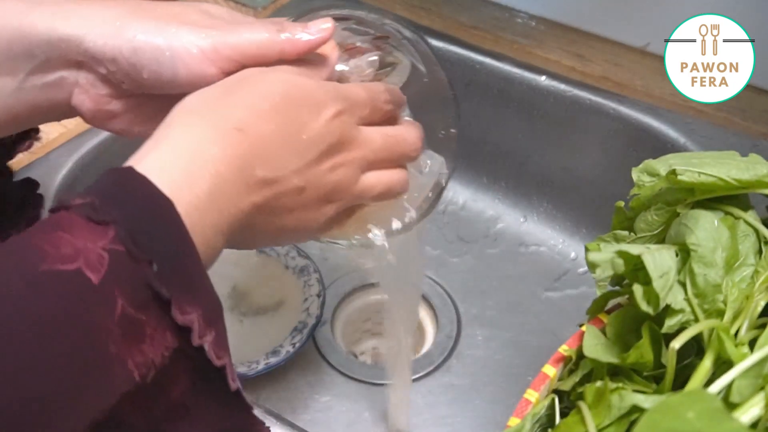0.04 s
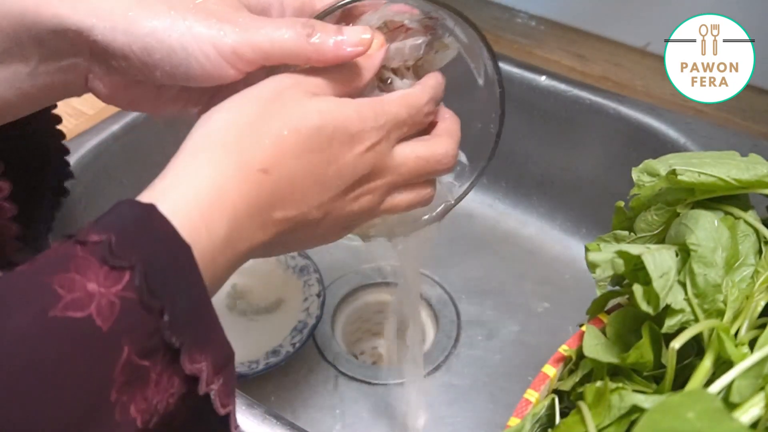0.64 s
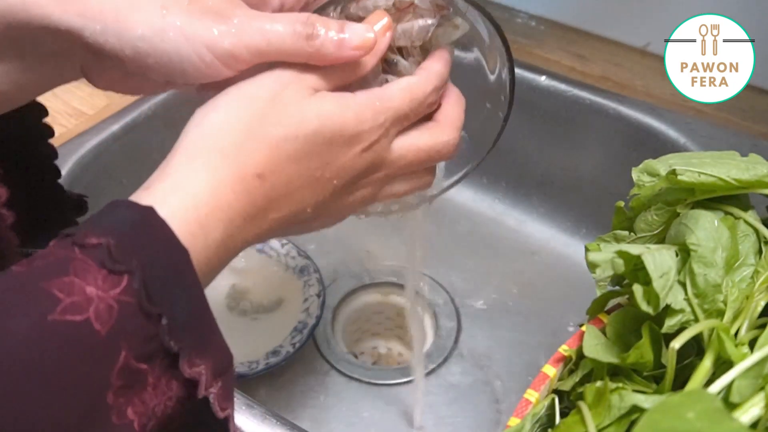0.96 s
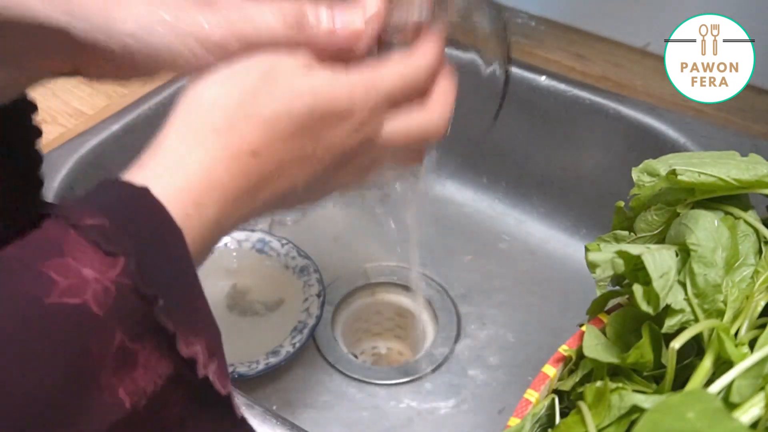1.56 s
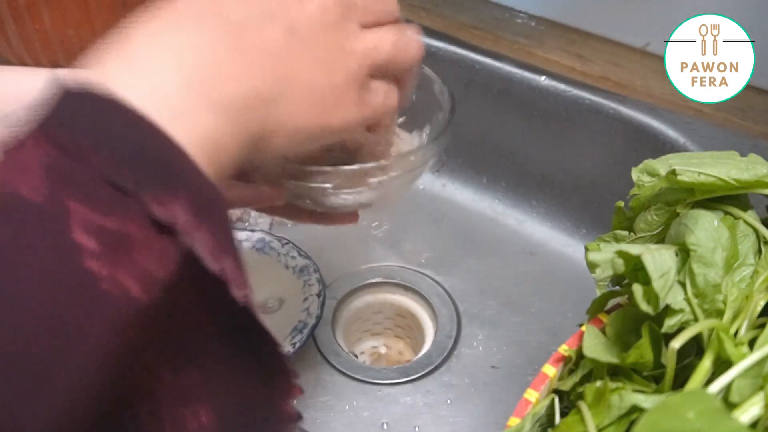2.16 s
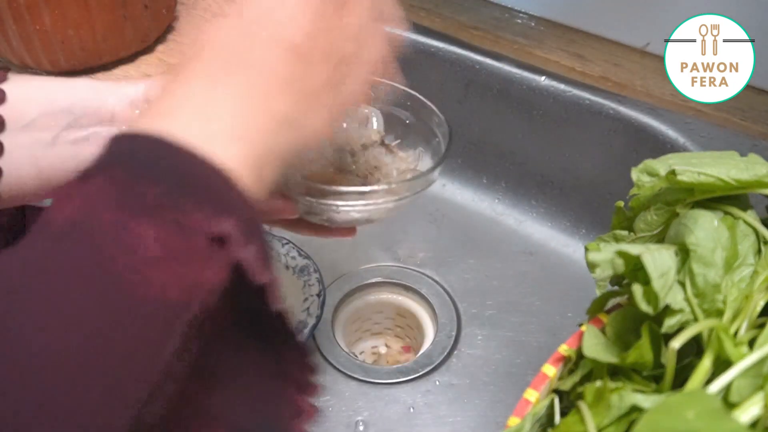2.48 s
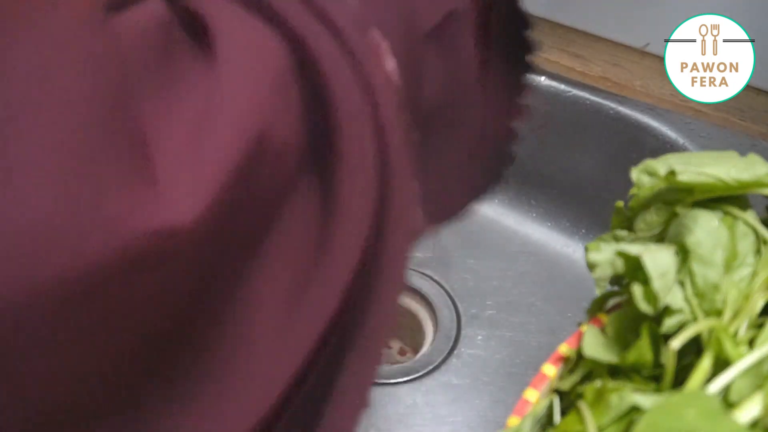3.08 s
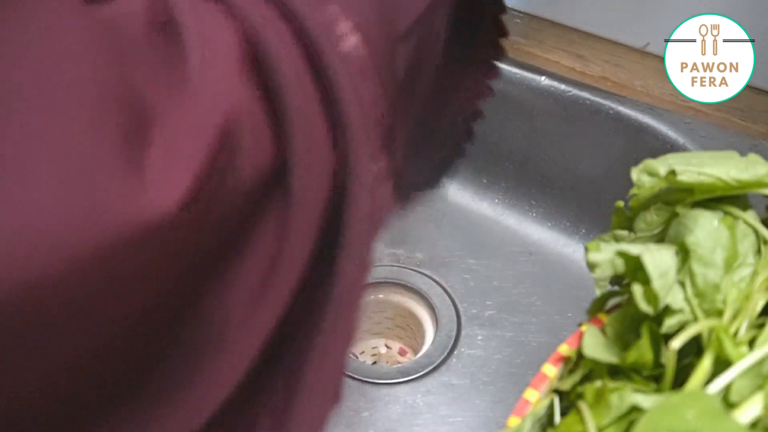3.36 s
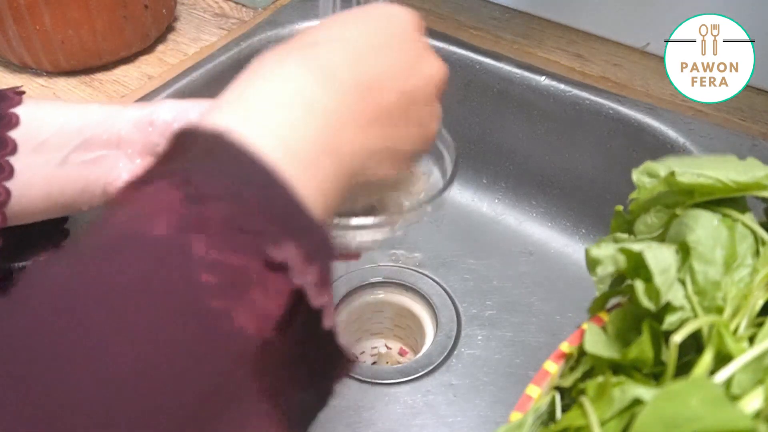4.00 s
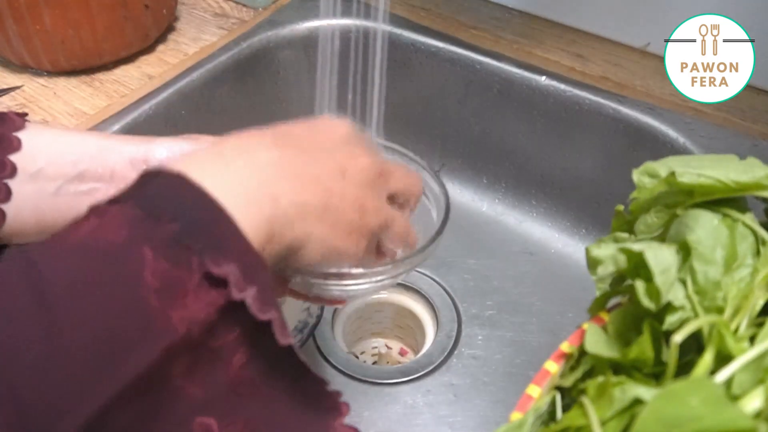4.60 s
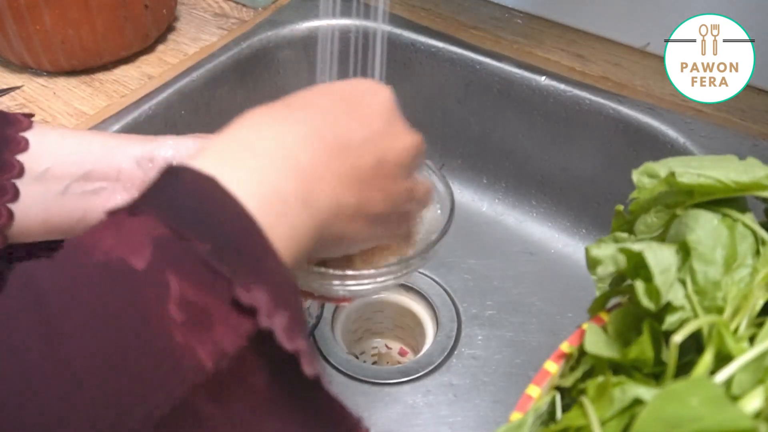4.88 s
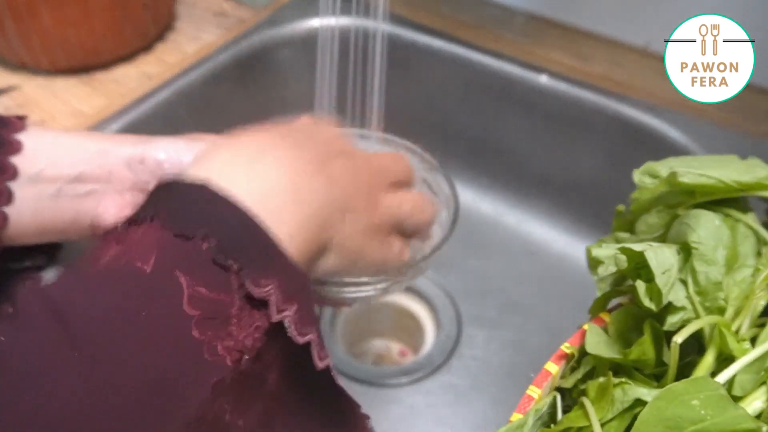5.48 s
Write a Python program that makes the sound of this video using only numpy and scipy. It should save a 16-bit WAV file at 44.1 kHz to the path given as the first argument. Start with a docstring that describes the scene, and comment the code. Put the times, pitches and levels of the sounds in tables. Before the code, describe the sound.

Water strained from a glass bowl patters into a steel sink, then thins to drips that ring the metal while the drain gurgles softly. A sleeve rubs past. The tap spits and opens, and its spray fizzes on the steel and into the bowl, where a hand stirs the water with bubbly sloshes. It is all heard from close by in a small kitchen.

```python
"""First you hear water pattering into a steel sink as it is strained from a glass bowl. It thins to drips
that ring the steel, and gurgles down the drain, where the air in the pipe rings. A sleeve rubs past,
then the tap whistles, spits and opens. Its spray fizzes on the steel and then into the bowl, which slowly
fills while a hand stirs in it; each trapped bubble rings a tiny note. A small kitchen, from close by."""
import sys
import numpy as np
from scipy import signal
from scipy.fft import rfft, irfft, next_fast_len
from scipy.io import wavfile

SR = 44100
rng = np.random.default_rng(int(sys.argv[2]) if len(sys.argv) > 2 else 0)


def bounce(signal):
    """Save signal as a 16-bit WAV file at the path given by the first command-line argument."""
    frames = np.transpose(np.atleast_2d(signal))
    limited = np.clip(frames, -1, 1)
    pcm = np.round(limited * 32767).astype(np.int16)
    wavfile.write(sys.argv[1], SR, pcm)


N = 249165
TIME = np.arange(N) / SR


def gain_of(db):
    """Turns decibels into a multiplier. Table levels are relative: each sound adds its own gain."""
    return 10 ** (np.asarray(db) / 20)


def evened(x):
    """Scales a sound to an average strength (rms) of one."""
    return x / np.sqrt(np.mean(x ** 2) + 1e-20)


def value_at(points, hz):
    """Reads between the rows of a (frequency, value) table, on a log-frequency axis."""
    known_hz, value = np.transpose(points)
    return np.interp(np.log(hz + 1), np.log(known_hz + 1), value)


def loudness(rows):
    """Joins (time, level) rows into a gain curve that fades quickly outside them."""
    times, db = np.transpose(rows)
    outside = np.maximum(times[0] - TIME, 0) + np.maximum(TIME - times[-1], 0)
    return gain_of(np.interp(TIME, times, db)) * np.exp(-(outside / 0.098) ** 2)


def held(start_s, end_s, attack_s, release_s):
    """A gain that rises, holds and dies away."""
    rise = 1 - np.exp(-np.maximum(TIME - start_s, 0) / attack_s)
    return rise * np.exp(-np.maximum(TIME - end_s, 0) / release_s)


def drift(rate_hz):
    """A slow random wobble of strength one."""
    return evened(signal.sosfilt(signal.butter(2, rate_hz, fs=SR, output="sos"), rng.standard_normal(N)))


def waver(depth_db, rate_hz):
    """A gain that wanders at random."""
    return gain_of(depth_db * drift(rate_hz))


def add(mix, start_s, sound):
    """Mixes a sound in at the given time."""
    part = mix[max(round(start_s * SR), 0):][:len(sound)]
    part += sound[:len(part)]


def colour(x, points):
    """Shapes the tone: turns each frequency up or down by a (frequency, level) table."""
    size = next_fast_len(len(x) + SR // 10)
    gains = gain_of(value_at(points, np.fft.rfftfreq(size, 1 / SR)))
    return irfft(rfft(x, size) * gains, size)[:len(x)]


def cut_lows(x, hz, order):
    """Removes sound below hz; a higher order cuts more steeply."""
    return signal.sosfilt(signal.butter(order, hz, "highpass", fs=SR, output="sos"), x)


def resonate(x, hz, width):
    """Lets through one band around hz; the narrower it is, the longer it rings."""
    return signal.lfilter(*signal.iirpeak(hz, hz / min(width, SR / 4), SR), x)


def sliding_resonance(x, hz, width):
    """A ringing band whose pitch follows the curve hz."""
    turn = np.exp(2j * np.pi * np.cumsum(hz) / SR)
    decay = np.exp(-np.pi * width / SR)
    return 2 * (turn * signal.lfilter([1 - decay], [1, -decay], x / turn)).real


def ring(x, notes):
    """Makes an object ring at several notes at once."""
    return sum(gain_of(db) * resonate(x, hz, width) for hz, width, db in notes)


def noisy_note(hz, width, samples=N):
    """Noise narrowed down to a fluttering note."""
    return evened(resonate(resonate(rng.standard_normal(samples), hz, width), hz, width))


def impacts(per_s, spread_db):
    """Random clicks of uneven size."""
    size = gain_of(spread_db * np.minimum(rng.exponential(1, N), 4))
    return size * rng.choice([-1, 1], N) * (rng.random(N) < per_s / SR)


def bubbles(per_s, spread_db, cycles, top_hz):
    """A cloud of bubbles of all sizes; each rings for a few cycles, its pitch creeping up."""
    births = impacts(per_s, spread_db)
    pitches = np.geomspace(top_hz / 16, top_hz, 40)
    pitch_index = np.searchsorted(pitches, rng.uniform(0, top_hz, N))
    out, t = np.zeros(N), np.arange(SR // 25) / SR
    for k, hz in enumerate(pitches):
        age = hz * t / cycles
        ping = np.sin(2 * np.pi * hz * t * (1 + .005 * np.minimum(age, 5))) * np.exp(-age)
        out += signal.oaconvolve(births * (pitch_index == k), evened(ping))[:N]
    return evened(out)


def wall_echoes(x, t60_s, count):
    """Quick echoes between the sink's walls; t60_s is the time they take to fade by 60 dB."""
    when, sign = rng.random((count, 2)).T
    echoes = np.zeros(SR // 40)
    delay = (when * (len(echoes) - 20)).astype(int) + 20
    echoes[delay] = np.sign(sign - .5) * gain_of(-60 * delay / SR / t60_s)
    return signal.oaconvolve(x, echoes / np.linalg.norm(echoes))[:len(x)]


# The notes of the steel where water lands: (pitch [Hz], width [Hz], level [dB])
STEEL_NOTES = [(700, 140, -3.5), (1750, 68, -5), (2030, 31, 0), (3140, 120, 3.5), (3630, 250, -0.5),
               (3980, 140, -5), (4650, 130, 1.5), (5470, 190, -1), (5900, 140, -7.5), (6450, 130, -8),
               (7100, 140, -3.5), (8120, 130, -10), (12400, 440, -13)]
def steel(x):
    """The sheet steel rings with whatever lands on it; part of the plain slap is heard too."""
    return 0.55 * x + ring(x, STEEL_NOTES)


def rattle(per_s, spots):
    """Water ticks on several spots of the steel, each with its own echoes."""
    out = np.zeros(N)
    for _ in range(spots):
        ticks = impacts(per_s / spots, spread_db=2.6)
        out += ticks + 1.3 * wall_echoes(ticks, t60_s=0.03, count=40)
    return steel(evened(out))


# How loudly the stream from the bowl patters: (time [s], level [dB])
POUR_LEVELS = [(0.0, -28), (0.17, -39.5), (0.5, -39), (0.7, -38.5), (0.79, -45.5), (0.88, -45), (1.03, -43),
               (1.12, -40), (1.26, -39.5), (1.42, -40.5), (1.56, -42.5), (1.87, -47), (2.14, -52.5),
               (2.4, -73)]
# The tone of that patter: (frequency [Hz], level [dB])
POUR_TONE = [(100, -56), (400, -21), (700, -21.5), (1300, -9.5), (2000, 0.5), (2700, 1), (3200, -4),
             (5000, -1), (7500, -2), (11000, -4), (15500, -9)]
def pour():
    """The falling stream breaks into ticks on the steel, bubbles and a sparkle of fine droplets."""
    ticks = rattle(per_s=260, spots=6)
    foam = bubbles(per_s=700, spread_db=3, cycles=6, top_hz=15000)
    sparkle = bubbles(per_s=260, spread_db=3.5, cycles=13, top_hz=13000)
    sparkle = evened(colour(sparkle, [(2500, -39), (4500, 11), (6500, 12), (14000, -1)]))
    stream = evened(colour(0.24 * foam + ticks, POUR_TONE)) + 0.54 * sparkle
    return gain_of(-5) * loudness(POUR_LEVELS) * waver(depth_db=2, rate_hz=18) * stream


# The low notes of the sink's floor: (pitch [Hz], width [Hz], level [dB])
FLOOR_NOTES = [(153, 17, 5), (233, 17, 5.5), (261, 54, 1.5), (620, 280, 1)]
def sink_floor():
    """The stream drums softly on the sheet steel; stray water keeps it drumming afterwards."""
    stream = gain_of(-47) * loudness(POUR_LEVELS) ** 0.39
    stray_water = gain_of(-72.5)
    return np.hypot(stream, stray_water) * evened(ring(impacts(per_s=510, spread_db=5.5), FLOOR_NOTES))


# The tone of the room's air: (frequency [Hz], level [dB])
AIR_TONE = [(15, -75), (25, -43), (90, -15), (142, -14), (383, -2), (462, -0.5), (856, -6.5), (1120, 2.5),
            (1280, 4.5), (1860, -18), (2070, -4), (2850, -17), (3540, -8.5), (5570, -4), (15000, -68)]
def room_tone():
    """Faint steady air noise with a low wavering hum."""
    air = evened(colour(rng.standard_normal(N), AIR_TONE))
    hum = noisy_note(hz=144.7, width=14)
    return gain_of(-60.5) * air + gain_of(-78) * hum


# The tone of a drop's splat: (frequency [Hz], level [dB])
SPLAT_TONE = [(100, -39), (400, -5.5), (1000, -2.5), (3000, 5.5), (6000, 7), (10000, 11.5), (13000, 7),
              (15500, 0)]
# The largest drops: (time [s], level [dB], pitch [Hz], splat level [dB], ring time [s])
BIG_DROPS = [(0.0121, -5.5, 5900, -35, 0.002), (0.031, -27, 5500, -53, .0026),
             (0.0602, -22, 2700, -51, .003), (0.1022, -18.5, 4760, -44, 0.0027),
             (0.168, -24, 4770, -37, 0.0028), (0.2243, -20, 6430, -33, .0026),
             (0.261, -17.5, 4370, -30.5, 0.0053), (0.283, -15, 3930, -46, 0.0023),
             (0.295, -16, 5280, -50, 0.0035), (0.3344, -22, 3580, -34, 0.0032),
             (0.357, -20.5, 4130, -35, .003), (0.433, -13.5, 6070, -47, .003),
             (0.5015, -19, 4350, -43, 0.0027), (0.613, -27, 6280, -43, .0026),
             (0.622, -24.5, 4900, -43, .0026), (0.662, -24.5, 8440, -40, .0024),
             (0.6832, -24.5, 4830, -40, .0026), (0.722, -22, 6340, -37, 0.0023),
             (0.7517, -25.5, 5470, -44, .003), (0.8293, -25, 6330, -40.5, 0.0023),
             (1.001, -28, 8980, -50, 0.0029), (1.065, -20.5, 4200, -42, 0.0019),
             (1.0893, -25, 5870, -48, 0.002), (1.1295, -21, 12300, -35.5, .0024),
             (1.1682, -26, 7100, -37, 0.0024), (1.206, -27.5, 3630, -43, .003),
             (1.2303, -19, 4850, -39, .0026), (1.2637, -15.5, 5030, -50, 0.0017),
             (1.272, -23, 5600, -54, .0026), (1.283, -28, 8150, -31.5, .0026),
             (1.304, -23.5, 5260, -46, 0.0023), (1.346, -30.5, 3560, -31.5, .0026),
             (1.3724, -21.5, 7980, -32, 0.0029), (1.427, -19.5, 9370, -40, 0.0041),
             (1.474, -19, 5330, -27, 0.0025), (1.499, -26, 7500, -33, .0026),
             (1.519, -11.5, 5450, -41, 0.0018), (1.544, -12.5, 5450, -30, 0.0022),
             (1.592, -5.5, 4300, -32, .0022), (1.614, -23, 4000, -31, .0026),
             (1.645, -25, 4560, -35, 0.0024), (1.6567, -10.5, 4340, -25.5, 0.0022),
             (1.662, -15, 6200, -49, 0.0023), (1.7243, -20, 7360, -36, 0.0027),
             (1.7298, -24.5, 4200, -35, 0.0021), (1.768, -21, 7380, -55, 0.002),
             (1.7978, -36, 3500, -52, .0026), (1.8148, -32, 4640, -59, 0.0028),
             (1.8457, -29.5, 6600, -38, .003), (1.872, -33, 4400, -43, .003),
             (1.8992, -31, 4900, -49, .003), (1.926, -26, 4620, -39.5, .003),
             (1.9554, -28.5, 6070, -33.5, .0026), (2.0934, -32, 7270, -41, 0.0026),
             (2.64, -46, 5900, -57, .0026), (3.132, -37, 4700, -58, .0015), (3.2, -39, 5340, -53, .001),
             (3.695, -11, 2800, -41, 0.0015), (3.7098, -5, 5030, -27, 0.0015),
             (3.7733, -4.5, 4000, -33, 0.0014), (3.8535, -12, 8260, -28, 0.0023),
             (4.4891, -3.5, 3380, -49, 0.0013), (5.64, -9.5, 7970, -31, 0.0022)]
def drops():
    """Each drop splats, rings the steel for an instant, and echoes between the sink's walls."""
    out, t = np.zeros(N), np.arange(SR // 12) / SR
    for start_s, db, hz, splat_db, ring_s in BIG_DROPS:
        slap_noise, splat_noise = rng.standard_normal((2, len(t)))
        fade = np.exp(-t / ring_s) * (1 - np.exp(-t * hz / 6))
        bubble = np.sin(2 * np.pi * hz * t * (1 + 2 * t)) * fade
        slap = evened(resonate(resonate(slap_noise, hz, .5 * hz), hz, 0.71 * hz)) * fade
        hit = steel(cut_lows(1.6 * bubble + slap, hz=2800, order=4))
        hit += 0.53 * wall_echoes(hit, t60_s=0.018, count=24)
        splat_fade = (np.exp(-t / 0.003) + 0.047 * np.exp(-t / 0.026)) * (1 - np.exp(-t / 0.001))
        splat = evened(colour(splat_noise, SPLAT_TONE)) * splat_fade
        add(out, start_s, gain_of(db - 4) * hit / abs(hit).max())
        add(out, start_s, gain_of(splat_db + 7.5) * (0.25 * splat + steel(splat)))
    return out


def splatter(peak_after_s=0.019):
    """Fine droplets thrown up by each big drop fall back around it."""
    power = np.zeros(N)
    age = np.arange(SR // 4) / SR / peak_after_s
    for start_s, db, *_ in BIG_DROPS:
        add(power, start_s, gain_of(db - 32.5) ** 2 * age * np.exp(1 - age))
    droplets = steel(bubbles(per_s=900, spread_db=3, cycles=9, top_hz=13000))
    return np.sqrt(power) * evened(colour(droplets, [(1500, -15), (3500, 1), (7000, 0), (13000, -8)]))


# Bubbles that plink in the shallow water: (time [s], level [dB], pitch [Hz])
PLINK_BUBBLES = [(0.064, -36, 6600), (0.082, -36, 3040), (0.126, -22.5, 4230), (0.184, -35, 10900),
                 (0.21, -35, 6350), (0.288, -23.5, 3460), (0.319, -25, 3900), (0.422, -36.5, 2450),
                 (0.4347, -32, 6930), (0.4605, -21, 2710), (0.514, -47, 9700), (0.529, -38, 9300),
                 (0.5556, -38, 2730), (0.7218, -35, 6450), (0.7936, -40, 8240), (0.825, -35, 6970),
                 (0.843, -33, 4850), (0.852, -35, 3400), (0.879, -34.5, 3150), (0.9373, -41.5, 8650),
                 (1.053, -39, 9750), (1.139, -36, 10700), (1.19, -41, 9400), (1.224, -39, 7900),
                 (1.253, -37, 5700), (1.3915, -33.5, 3590), (1.407, -53, 7800), (1.429, -37, 10900),
                 (1.4486, -38, 6000), (1.457, -37, 7540), (1.577, -49, 2350), (1.714, -35, 5380),
                 (1.9776, -35, 3460), (2.033, -46, 9450), (2.1026, -39, 4040), (2.1505, -40, 3700),
                 (2.174, -45, 4130), (2.3313, -41, 4200), (3.935, -22.5, 5440), (4.662, -20.5, 5230),
                 (4.825, -24, 7120), (4.83, -26, 6400), (5.152, -19, 3510), (5.225, -21, 6560),
                 (5.533, -21.5, 3130)]
def plinks():
    """A droplet ticks on the steel and traps a bubble, whose note rises; small ones die sooner."""
    out, t = np.zeros(N), np.arange(SR // 12) / SR
    for start_s, db, hz in PLINK_BUBBLES:
        ring_s = 0.0023 * np.sqrt(3000 / hz)
        swell = (t / ring_s) * np.exp(-(t / ring_s) ** 2)
        note = np.sin(2 * np.pi * hz * t * (1 + 11 * t)) * swell
        hiss = cut_lows(rng.standard_normal(len(t)), .7 * hz, order=4)
        tick = steel(evened(resonate(hiss, hz, .5 * hz))) * (swell + 0.069 * np.exp(-t / 0.0067))
        plink = note + 0.3 * tick
        plink += 0.96 * wall_echoes(plink, t60_s=0.053, count=24)
        add(out, start_s, gain_of(db + 5) * plink / abs(plink).max())
    return out


# Spurts and splashes: (time [s], level [dB], length [s], strongest frequency [Hz], low cut [Hz])
SPURTS = [(0.27, -33.5, 0.045, 4200, 1810), (0.493, -38, 0.012, 4800, 1200),
          (0.844, -40, 0.016, 4970, 1500), (0.878, -39, 0.022, 4330, 1500),
          (3.354, -19.5, 0.0055, 4300, 1280), (3.3673, -20, 0.0045, 5340, 1400),
          (3.482, -22, 0.0055, 9500, 3000), (3.641, -19.5, 0.0037, 11400, 7000),
          (3.646, -27.5, 0.029, 2800, 398), (3.796, -25, 0.012, 3040, 1100),
          (3.886, -27.5, 0.056, 8050, 1500), (4.381, -9.5, 0.035, 2753, 260),
          (4.641, -22, 0.0027, 8670, 4000), (4.655, -20, 0.004, 8500, 3000),
          (5.149, -18.5, 0.003, 8000, 4000), (5.184, -23, 0.0026, 7800, 4000),
          (5.197, -20, 0.012, 5500, 3000), (5.211, -17, 0.0032, 7300, 3500),
          (5.225, -22.5, 0.007, 7500, 4000), (5.335, -16, 0.003, 6600, 3500),
          (5.584, -22, 0.0034, 9000, 4000), (5.598, -21, 0.017, 4500, 2500)]
def splashes():
    """Slugs of water burst into a short, dense shower of droplets; small ones are thin and bright."""
    out = np.zeros(N)
    tone = [(100, -15), (400, 2.5), (1200, 7.5), (7000, 7.5), (15000, 1)]
    for start_s, db, length_s, hz, low_cut_hz in SPURTS:
        age = np.maximum(TIME - start_s, 0) / length_s
        droplets = cut_lows(impacts(per_s=9000, spread_db=2.8), low_cut_hz, order=2)
        shower = evened(colour(resonate(droplets, hz, width=hz), tone))
        out += gain_of(db) * shower * (1 - np.exp(-age / 0.12)) * np.exp(-age ** 2 / 2)
    return out


# The steady notes of the drain's throat: (pitch [Hz], width [Hz], level [dB])
THROAT_NOTES = [(238, 27, -39), (440, 34, -33), (1500, 53, -7), (2130, 93, -5), (3680, 59, -11)]
def burble():
    """Small bubbles keep the drain's throat ringing; its main note wanders as water narrows the gap."""
    pops = impacts(per_s=420, spread_db=2.6)
    main_hz = 1120 * (1 + 0.027 * drift(rate_hz=13))
    return evened(ring(pops, THROAT_NOTES) + gain_of(7) * sliding_resonance(pops, main_hz, width=50))


PIPE_HZ = 477
def trickle(start_s=0.72, end_s=3.4):
    """Water runs unevenly down the drain; as it empties, the burble fades and the pipe's note grows."""
    age = np.maximum(TIME - start_s, 0)
    flow = held(start_s, end_s, attack_s=0.15, release_s=0.35) * waver(depth_db=2.1, rate_hz=11)
    throat = gain_of(-50.5 - 3 * age) * burble()
    pipe = evened(resonate(impacts(per_s=55, spread_db=-6), PIPE_HZ, width=38))
    return flow * (throat + gain_of(-84 + 5.5 * age) * pipe)


# Gulps of air in the drain: (time [s], level [dB], pitch [Hz], pipe level [dB])
AIR_GULPS = [(0.9322, -38.5, 1112, -69), (0.937, -44, 2030, -64), (0.9856, -37, 1110, -62),
             (1.1424, -38.5, 1107, -55), (1.2054, -36.5, 1116, -49), (1.605, -40, 1100, -55),
             (1.686, -44, 1150, -55), (1.753, -40, 1093, -67), (1.8816, -44, 2130, -76),
             (1.9794, -47, 2220, -60), (2.0253, -44.5, 2100, -54), (2.0702, -43, 2070, -60),
             (2.166, -40, 1105, -54), (2.2406, -52, 2160, -47), (2.464, -39.5, 1094, -45.5),
             (2.866, -37, 1130, -49), (2.9218, -45, 1010, -46.5), (3.1801, -30, 1157, -50),
             (3.241, -45, 1125, -54), (3.261, -42.5, 1140, -69), (3.2803, -44, 1130, -71)]
def gulps():
    """The drain swallows air: a slightly rising note, a ragged tail of froth and the pipe's low ring."""
    out, t = np.zeros(N), np.arange(SR // 8) / SR
    for start_s, db, hz, pipe_db in AIR_GULPS:
        note = np.sin(2 * np.pi * hz * t * (1 + 0.92 * t)) * np.exp(-t / 0.0078)
        froth = noisy_note(hz, width=200, samples=len(t)) * np.exp(-t / 0.029)
        pipe = (np.sin(2 * np.pi * PIPE_HZ * t) + 0.38 * np.sin(2 * np.pi * 222 * t)) * np.exp(-t / 0.011)
        gulp = gain_of(db + 5.5) * (note + 0.074 * froth) + gain_of(pipe_db) * pipe
        add(out, start_s - .002, gulp * (1 - np.exp(-t / 0.002)))
    return out


# How loudly the sleeve rubs: (time [s], level [dB])
SLEEVE_LEVELS = [(2.2, -50), (2.372, -51.5), (2.596, -51), (2.74, -45.5), (2.9, -40), (3.032, -44.5),
                 (3.234, -44), (3.35, -51)]
# The tone of the cloth: (frequency [Hz], level [dB])
CLOTH_TONE = [(120, -42), (400, -1.5), (750, -6), (1400, 5), (2500, 1), (3800, 3.5), (6000, -4),
              (9000, -12), (15500, -25)]
def sleeve():
    """Cloth slides by: a dense, soft rub of fibres."""
    fibres = impacts(per_s=11000, spread_db=4)
    return gain_of(-9) * loudness(SLEEVE_LEVELS) * evened(colour(fibres, CLOTH_TONE))


TAP_OPEN_S = 3.365
def whistle():
    """A thin, fluttering tone just before the water comes."""
    swell = held(start_s=3.15, end_s=TAP_OPEN_S, attack_s=0.0068, release_s=.015)
    return gain_of(-61.5) * swell * noisy_note(hz=3810, width=110)


# The notes that the spray rings in the filling bowl: (pitch [Hz], width [Hz], level [dB])
BOWL_NOTES = [(1480, 104, 13.5), (2640, 70, -10), (4200, 56, -13), (4500, 70, -16), (7500, 250, -2)]
# The tone of the fizzing spray: (frequency [Hz], level [dB])
FIZZ_TONE = [(200, -46), (800, -17.5), (2000, 1.5), (3300, 2.5), (4300, 5.5), (5000, 2.5), (7300, 0),
             (8200, -2), (11400, -5), (15500, -14)]
def fizz(flow, open_for_s):
    """Fine jets fizz where they land, louder as the bowl fills."""
    spray = evened(impacts(per_s=20000, spread_db=2.6))
    spray += bubbles(per_s=6000, spread_db=3.2, cycles=10, top_hz=15500)
    uncovered = held(start_s=4.68, end_s=N / SR, attack_s=0.08, release_s=0.1)
    spray += 0.49 * uncovered * ring(spray, BOWL_NOTES)  # the bowl rings once the hand is out of the way
    filling_db = -27.5 + open_for_s  # grows 1 dB each second
    hand_db = -3 * np.exp(-((TIME - 4.75) / 0.08) ** 2)  # the lifted hand briefly softens the spray
    level = flow * gain_of(filling_db + hand_db) * waver(depth_db=1, rate_hz=25)
    return level * evened(colour(spray, FIZZ_TONE))


# Strokes of the hand: (time [s], length [s], small bubble level [dB], medium bubble level [dB])
HAND_STIRS = [(3.576, 0.078, -26.5, -41), (3.793, 0.013, -36, -47), (3.899, 0.014, -28, -35.5),
              (3.979, 0.048, -28, -32), (4.003, 0.086, -16, -25.5), (4.078, 0.096, -18, -35.5),
              (4.177, 0.069, -18, -30), (4.26, 0.24, -21.5, -32), (4.354, 0.13, -20, -27),
              (4.487, 0.12, -15, -28.5), (4.626, 0.055, -39, -34.5), (4.837, 0.071, -25.5, -41),
              (4.911, 0.078, -24, -26.5), (4.998, 0.14, -26, -24.5), (5.16, 0.14, -32, -31.5),
              (5.313, 0.22, -32, -29), (5.49, 0.16, -28, -39)]
def stirring(flow):
    """Gains for small and medium bubbles: they follow the flow, and each stir lets more air in."""
    small, medium = flow * gain_of(-46), flow * gain_of(-45)
    for start_s, length_s, small_db, medium_db in HAND_STIRS:
        stir = held(start_s, start_s + length_s, attack_s=0.005, release_s=0.021)
        small = np.hypot(small, gain_of(small_db) * stir)
        medium = np.hypot(medium, gain_of(medium_db) * stir)
    return small, medium


# The notes of the air inside the sink: (pitch [Hz], width [Hz], level [dB])
BASIN_NOTES = [(1410, 41, 4), (1884, 25, 1), (2130, 72, 5), (2350, 89, -0.5), (2640, 15, 8.5),
               (2800, 52, 1), (3210, 20, 5), (3627, 43, 9), (4180, 95, 7.5)]
# The tones of small, medium and large bubbles: (frequency [Hz], level [dB])
SMALL_TONE = [(400, -37), (1000, -12), (1500, -5), (2150, 1), (2900, 1.5), (3250, 5), (3900, -2),
              (4900, -8.5), (8000, -5), (15000, -50)]
MEDIUM_TONE = [(300, -72), (700, -46), (850, -21), (1030, 0.5), (1250, -9.5), (1470, 2), (1700, -3),
               (2500, -1.5), (6000, -52)]
LARGE_TONE = [(150, -71), (330, -17.5), (500, -14), (650, -0.5), (820, 1.5), (1100, -13), (2500, -50)]
def bubbling(flow):
    """The jets plunge into the bowl and churn up bubbles; large ones well up as the water gets deep."""
    small_gain, medium_gain = stirring(flow)
    small_gain *= waver(depth_db=1.44, rate_hz=7.4)
    welling = gain_of(-49.5) * np.exp(-((TIME - 5.316) / 0.25) ** 2)
    large_gain = (flow > 0) * gain_of(-64) + welling
    small = bubbles(per_s=4600, spread_db=2, cycles=6, top_hz=6000)
    bigger = bubbles(per_s=1700, spread_db=0.6, cycles=9.6, top_hz=3001)
    return (gain_of(-5.5) * small_gain * evened(colour(small + ring(small, BASIN_NOTES), SMALL_TONE))
            + gain_of(-3.5) * medium_gain * evened(colour(bigger, MEDIUM_TONE))
            + large_gain * evened(colour(bigger, LARGE_TONE)))


def tap(first_flow=0.26, rise_s=0.42):
    """The flow builds up as the tap is turned, and drives both the fizz and the bubbles."""
    open_for_s = np.maximum(TIME - TAP_OPEN_S, 0)
    flow = (open_for_s > 0) * (1 - (1 - first_flow) * np.exp(-open_for_s / rise_s))
    return fizz(flow, open_for_s) + bubbling(flow)


# Air between hand, water and glass: (time [s], level [dB], length [s], start pitch [Hz], end pitch [Hz])
AIR_POCKETS = [(4.006, -12, 0.045, 2135, 2008), (4.055, -22, 0.049, 2875, 2590),
               (4.123, -16, 0.065, 2950, 3090), (4.161, -48.5, 0.091, 454, 400),
               (4.214, -17, 0.031, 3244, 3290), (4.313, -24.5, 0.091, 1470, 1520),
               (4.512, -12.5, 0.068, 3310, 3180), (4.565, -12.5, 0.049, 3224, 3256),
               (4.581, -16, 0.079, 1860, 1725), (4.682, -20.5, 0.046, 2620, 2910),
               (4.748, -22, 0.049, 2640, 2860), (4.762, -19, 0.039, 4200, 4400),
               (4.823, -24, 0.04, 4400, 4350), (4.921, -19, 0.055, 2100, 2350),
               (5.04, -34, 0.044, 1590, 1817), (5.129, -21, 0.092, 2180, 2936),
               (5.338, -24.5, 0.026, 1406, 1480), (5.514, -24, 0.062, 2600, 3040),
               (5.6, -21, 0.039, 2130, 2250)]
def pockets(width_hz=380, attack_s=0.0094):
    """The spray rings pockets of air, whose pitch slides as the hand and the water move."""
    out, t = np.zeros(N), np.arange(SR // 6) / SR
    smoothing = signal.windows.hann(int(1.4 * SR / width_hz))
    for start_s, db, length_s, start_hz, end_hz in AIR_POCKETS:
        progress = np.minimum(t / length_s, 1)
        # smoothed noise shakes the note's strength and timing, so it sounds rough
        flutter = signal.fftconvolve(rng.standard_normal((len(t), 2)) @ [1, 1j], smoothing, "same")
        note = np.exp(2j * np.pi * np.cumsum(start_hz + (end_hz - start_hz) * progress) / SR)
        swell = (1 - np.exp(-t / attack_s)) * (1 - progress ** 3)
        add(out, start_s, gain_of(db - 4.5) * evened((flutter * note).real) * swell)
    return out


# How long the kitchen echoes: (frequency [Hz], time to fade by 60 dB [s])
KITCHEN_FADE = [(200, 0.49), (1000, 0.26), (4000, 0.14), (14000, 0.15)]
def kitchen(x):
    """The room adds a soft wash of echoes whose high notes die first."""
    hz, t, noise = signal.stft(rng.standard_normal(SR // 2), SR, nperseg=256)
    fade = gain_of(-60 * t / value_at(KITCHEN_FADE, hz)[:, None]) * (1 - np.exp(-t / 0.0026))
    tail = signal.istft(noise * fade, SR, nperseg=256)[1]
    return signal.fftconvolve(x, tail / np.linalg.norm(tail))[:N]


# How wide the sound spreads between the ears: (frequency [Hz], side level [dB])
STEREO_SPREAD = [(60, -14), (150, -29), (300, -15.5), (1300, -18), (2800, -15.5), (5600, -10.5),
                 (10000, -7), (14000, -3.5)]
def scene():
    """Mixes it all. Droplets land left and right; echoes, cloth and room air widen the high notes."""
    falling = pour() + drops() + splatter() + plinks() + sink_floor()
    sloshing = splashes() + pockets()
    sloshing = 0.83 * sloshing + 0.037 * ring(sloshing, BASIN_NOTES)
    sounds = falling + sloshing + trickle() + gulps() + sleeve() + whistle() + tap()
    mid = sounds + gain_of(-12) * kitchen(sounds) + room_tone()
    left_right = noisy_note(hz=50, width=60)  # a fast wobble gives each droplet its own place
    reflected = wall_echoes(mid, t60_s=0.068, count=200)
    side = colour(0.38 * mid * left_right + 0.77 * reflected + 2 * (room_tone() + sleeve()), STEREO_SPREAD)
    return np.array([mid + side, mid - side]) * gain_of([[-.3], [.3]])


def record(dry, bottom_hz=85, top_hz=15950):
    """Rounds off the loudest peaks, then trims the deep bass and the very highest treble."""
    rounded = dry / (1 + (dry / .92) ** 12) ** (1 / 12)
    thinned = cut_lows(rounded, bottom_hz, order=3)
    treble_cut = signal.firwin(1023, top_hz, window=("kaiser", 9), fs=SR)
    return signal.oaconvolve(thinned, treble_cut[None], "same")


dry = scene()
out = record(dry)
bounce(out)
```